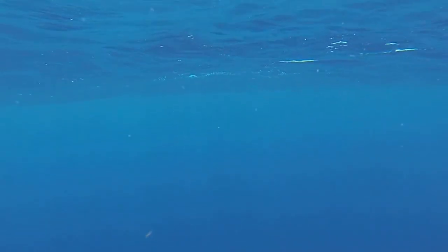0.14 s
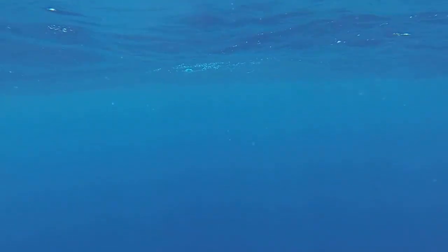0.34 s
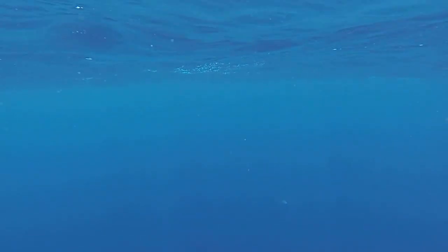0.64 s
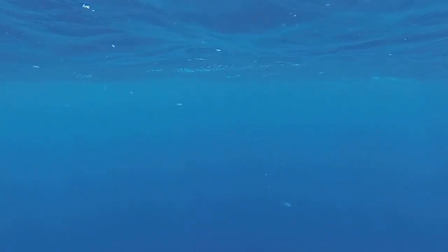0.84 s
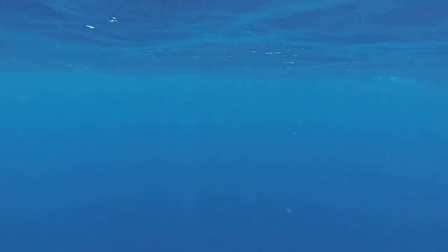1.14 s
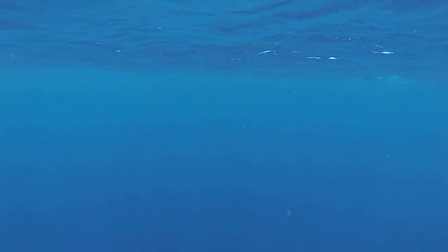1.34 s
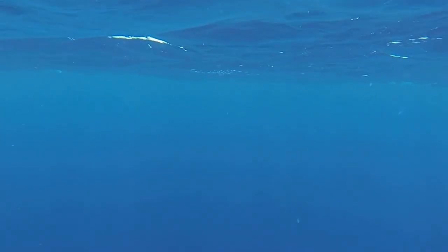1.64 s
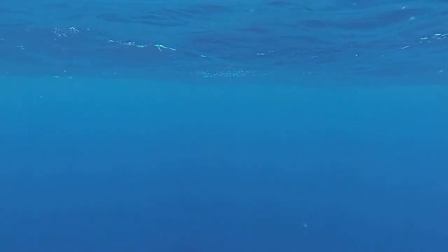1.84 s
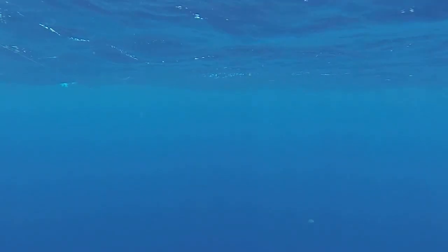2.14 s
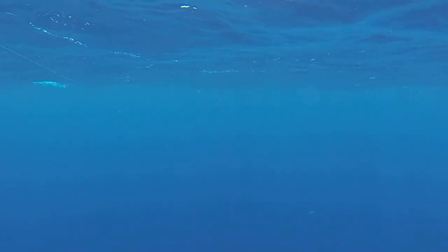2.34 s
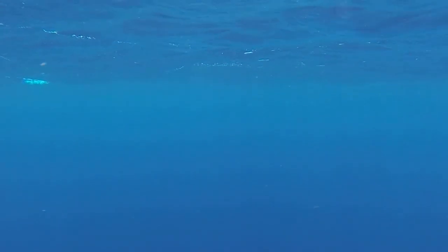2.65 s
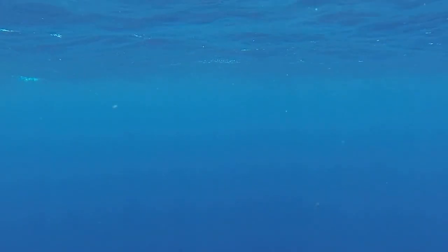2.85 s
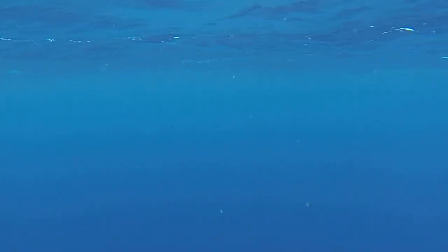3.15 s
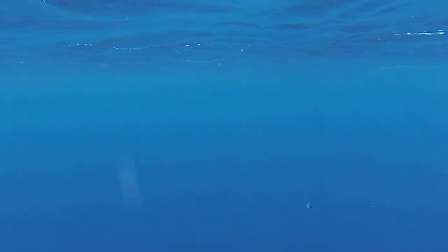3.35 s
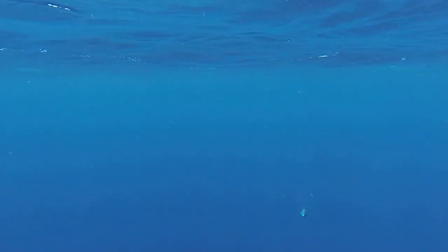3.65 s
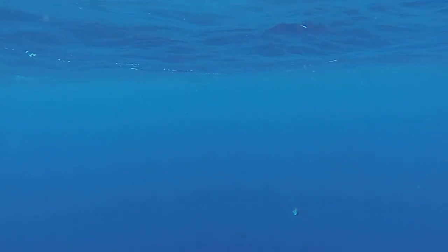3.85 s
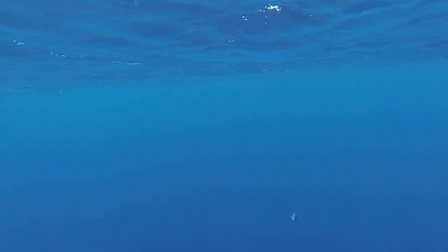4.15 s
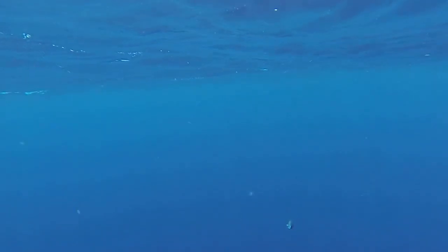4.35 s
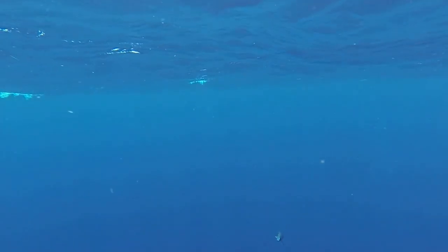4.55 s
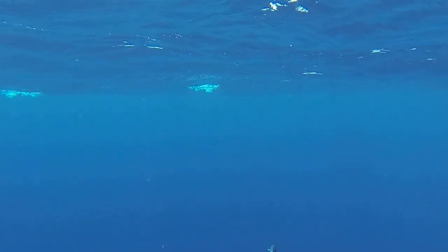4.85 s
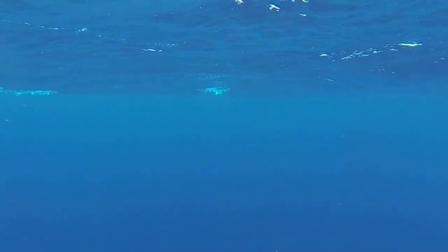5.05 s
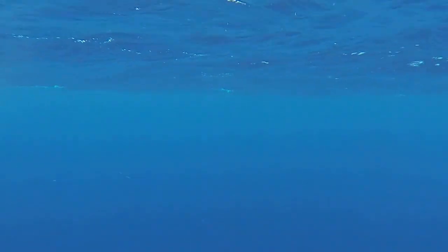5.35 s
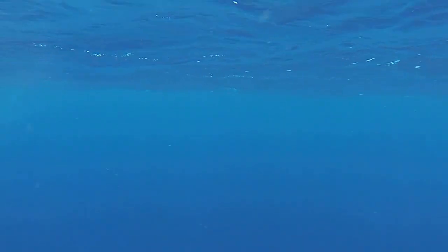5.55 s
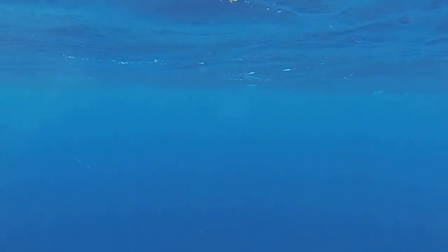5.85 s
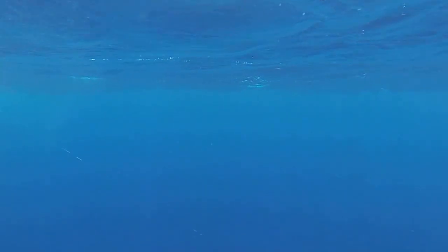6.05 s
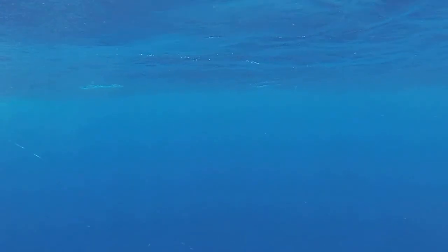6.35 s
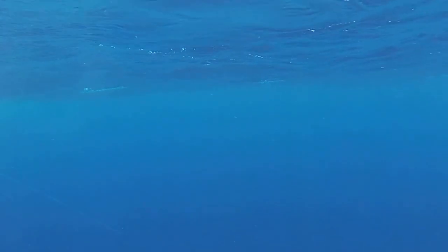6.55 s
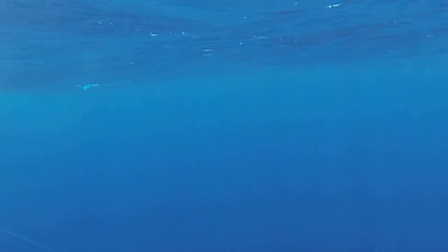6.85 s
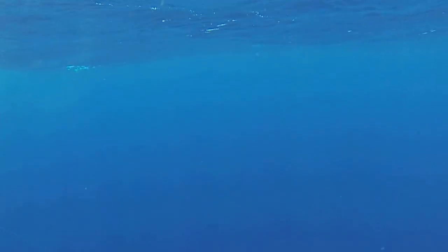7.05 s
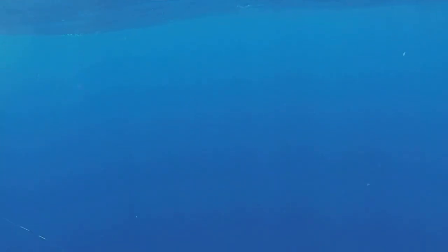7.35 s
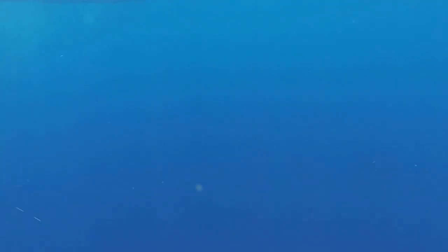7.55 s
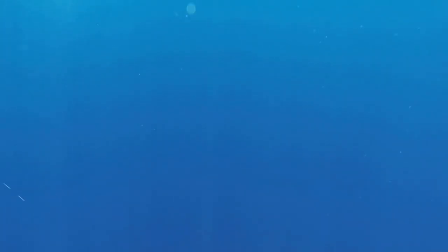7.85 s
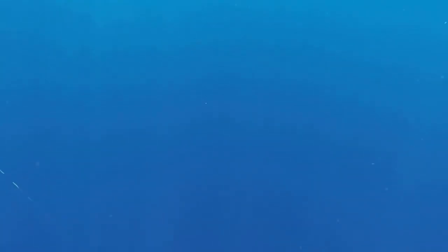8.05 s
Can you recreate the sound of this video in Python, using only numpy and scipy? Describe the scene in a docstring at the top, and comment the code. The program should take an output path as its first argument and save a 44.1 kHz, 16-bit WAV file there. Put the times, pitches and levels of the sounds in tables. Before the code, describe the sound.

Underwater, an idling boat engine hums and rattles, gently swelling and fading over low water rumble and occasional bubble gulps.

```python
"""A six-cylinder boat diesel runs at about 700 rpm, heard from just under the sea surface.
Its periodic firing forces the hull to drone at the engine orders, and its knocks, repeating each
cycle, excite damped resonances in the metal. The sound swells and fades as waves pass overhead.
Water rumbles and air pockets gulp against the case of a submerged camera; a few ticks and the
thin whine and hiss of its electronics lie on top."""
import sys
import numpy as np
from scipy import signal
from scipy.fft import rfft, irfft, next_fast_len
from scipy.io import wavfile
from scipy.ndimage import uniform_filter1d, map_coordinates

SR = 44100
rng = np.random.default_rng(int(sys.argv[2]) if len(sys.argv) > 2 else 0)


def pcm_store(signal):
    """Save signal as 16-bit PCM."""
    levels = np.round(np.clip(np.atleast_2d(signal), -1, 1) * 32767)
    wavfile.write(sys.argv[1], SR, levels.astype(np.int16).T)


N = 361619
TIME = np.arange(N) / SR
FREQ = np.maximum(np.fft.rfftfreq(N, 1 / SR), 1)
CYLINDERS = 6

# engine speed, hunting about its idle: (time [s], firing rate [Hz])
FIRING_RATE = [(0.0, 34.42), (1.15, 35.55), (1.69, 34.55), (1.97, 34.5), (2.46, 35.8), (3.23, 34.58),
               (3.74, 35.19), (4.56, 34.74), (4.92, 35.27), (5.54, 35.24), (5.97, 34.15), (6.21, 34.44),
               (6.45, 35.46), (6.64, 35.58), (7.15, 34.82), (7.87, 35.12), (8.2, 35.02)]
def crankshaft(twist_firings=0.006):
    """Phase is the integral of frequency: the running count of firings, jittered by uneven rotation."""
    return np.cumsum(curves(FIRING_RATE)[0]) / SR + twist_firings * drift(10)

# hull tones: (frequency [multiple of firing rate], level [dB re hull])
HULL_ORDERS = [(1, 2), (5, -4.5), (6, -10.5), (8, -13.5), (9, -8), (11, -23), (14, -25), (15, -22),
               (19, -25), (20, -25), (21, -17.5), (24, -28), (25, -26), (26, -29)]
# hull response: (frequency [Hz], relative gain [dB])
HULL_RESPONSE = [(15, -29.5), (45, -15), (60, 6), (85, 0.5), (102, 3), (120, 6.5), (135, 6), (155, 3),
                 (172, -3), (190, 4.5), (208, 6), (230, -7.5), (295, -3), (335, -5), (370, -9.5),
                 (480, -28), (700, -63.5)]
def hull(firings):
    """Forced vibration: firing orders, with cycle harmonics between as no two cylinders push alike."""
    tones = sum(undb(db) * order_tone(firings, k, waver_db=.5 + .7, waver_rad=.22)
                for k, db in HULL_ORDERS)
    sounded_orders = [k for k, _ in HULL_ORDERS] + [2, 2.5, 3, 3.5, 7]
    comb = unit(ring(cyclic_noise(firings, repeat=0.57, skip=sounded_orders), spectrum(HULL_RESPONSE)))
    return wave_gain(db=-43.5, follow=2.2) * (tones + beating(firings) + undb(2.35) * comb)

def beating(firings, order=7, db=-7.5, second_db=-4, beat_s=0.6, crest_s=0.13):
    """Interference: an engine order and a weaker tone just above it beat at their difference frequency."""
    phase = 2 * np.pi * order * firings
    second = undb(second_db) * np.sin(phase + 2 * np.pi * (TIME - crest_s) / beat_s)
    return undb(db) * np.sqrt(2) * (np.sin(phase) + second)

# tones that follow the waves: (frequency [multiple of firing rate], level [dB], swell response [dB/dB])
SWELLING_ORDERS = [(2.5, -44, 3), (3, -45, 0.7)]
# tones that fade on their own: (time [s], level of order 2 [dB], level of order 3.5 [dB])
FADING_ORDERS = [(0, -39, -39), (0.4, -50, -42), (1.0, -35, -37.5), (1.5, -47, -41), (1.9, -41, -41),
                 (2.3, -40, -39.5), (3.05, -40, -35), (3.55, -49, -48.5), (3.95, -58, -42.5),
                 (4.3, -44, -35), (4.7, -32.5, -31), (5.15, -35.5, -41), (5.65, -48.5, -46.5),
                 (6.35, -45, -33), (6.9, -43.5, -42), (7.35, -39.5, -37), (7.849, -37, -29.5),
                 (8.2, -37, -31.5)]
def drone(firings):
    """Periodic forcing: strong low tones at whole and half multiples of the firing rate."""
    swelling = sum(order_tone(firings, k, waver_db=3.6, waver_rad=0.51) * wave_gain(db, follow)
                   for k, db, follow in SWELLING_ORDERS)
    fading = sum(order_tone(firings, k, waver_db=.5, waver_rad=.3) * undb(db)
                 for k, db in zip((2, 3.5), curves(FADING_ORDERS)))
    return swelling + fading

def order_tone(firings, order, waver_db, waver_rad):
    """Random modulation: the moving surface makes one engine order waver in level and phase."""
    phase = 2 * np.pi * (order * firings + rng.random()) + waver_rad * drift(1.18)
    return unit(np.sin(phase) * undb(waver_db * drift(0.94)))

# firing and valve knocks of one cycle: (position [firings], thud level [dB], clatter level [dB])
CYCLE_KNOCKS = [(0.08, -19, -15), (0.309, -6.5, -3), (0.539, -9, -6.5), (1.1, -22, -13), (1.311, 0.5, -1.5),
                (1.52, -10, -8.5), (2.28, -8, -0.5), (2.52, -3.5, -8.5), (2.769, -31.5, -16),
                (3.091, -28, -8), (3.309, -7.5, -1), (3.53, -5.5, -10), (4.294, -5.5, -4), (4.54, -11, -11),
                (4.72, -12, -13.5), (5.05, -9.5, -12.5), (5.288, -1.5, -1), (5.56, -13.5, -7)]
THUD_COLUMN, CLATTER_COLUMN = 1, 2
# firings that strike harder, scaled by each layer's accent: (time [s], extra level [dB])
HARD_FIRINGS = [(0.9, 1.5), (1.01, 3), (1.04, 5.5), (1.13, 4), (1.24, 7), (2.47, 4), (2.72, 2.5),
                (2.78, 4.5), (2.89, 2), (2.92, 3.5), (2.95, 4), (3.04, 2.5), (3.12, 5.5), (4.15, 4.5),
                (4.3, 5.5), (4.5, 5), (4.95, 2), (5.18, 4), (5.24, 1.5), (5.72, 0.5), (5.95, 3.5),
                (6.22, 3), (6.36, 3.5), (6.56, 3), (7.04, 3.5), (7.15, 4.5), (7.24, 1), (7.58, 4),
                (7.78, 1.5), (7.9, 0.5), (7.92, 2.5)]
def knocks(firings, column, modes, rise_s, decay_s, scatter_db, accent, wash_db, alike, repeat, evenness):
    """Impact excitation: each knock sets off a short, exponentially decaying rattle in the modes."""
    table, age = np.array(CYCLE_KNOCKS), np.arange(2048) / SR
    cycle_starts = CYLINDERS * np.arange(int(firings[-1] / CYLINDERS) + 1)
    positions = np.add.outer(cycle_starts, table[:, 0]).ravel()
    # all knocks of one firing share its force
    force_db = scatter_db * rng.standard_normal(CYLINDERS * len(cycle_starts))
    for s, extra_db in HARD_FIRINGS:
        force_db[int(np.interp(s, TIME, firings))] = accent * extra_db
    knock_db = np.tile(table[:, column], len(cycle_starts)) + force_db[positions.astype(int)]
    impacts = np.bincount(np.searchsorted(firings, positions), undb(knock_db) ** 2, N)
    # multipath through hull and water rounds each attack and leaves a wash between knocks
    shape = (1 - np.exp(-age / rise_s)) * np.exp(-age / decay_s)
    power = signal.fftconvolve(impacts, shape ** 2)[:N]
    envelope = np.sqrt(np.abs(power / power.mean()) + undb(wash_db) ** 2)
    # the rattle is partly alike in every firing, partly the cylinder's own, partly new
    common = np.sqrt(alike) * cyclic_noise(firings, repeat=0.99, period=1)
    individual = np.sqrt(1 - alike) * cyclic_noise(firings, repeat)
    body = np.sqrt(resonances(modes))  # square root, as it filters twice
    rattle = signal.hilbert(ring(common + individual, body), next_fast_len(N))[:N]
    even_rattle = rattle.real / np.abs(rattle) ** evenness  # flattened so the knocks set the beat
    return unit(ring(envelope * even_rattle, body))

def cyclic_noise(firings, repeat, period=CYLINDERS, skip=()):
    """Partial periodicity: a share of the noise recurs every `period` firings, less the skipped orders."""
    size = 1024 * period
    harmonics = np.exp(2j * np.pi * rng.random(size // 2))
    harmonics[[round(period * k) for k in skip]] = 0
    position = firings / period % 1 * size
    periodic = map_coordinates(irfft(harmonics, size), [position], order=1, mode="nearest")
    return np.sqrt(repeat) * unit(periodic) + np.sqrt(1 - repeat) * rng.standard_normal(N)

# the hull's main metallic modes: (frequency [Hz], bandwidth [Hz], relative gain [dB])
METAL_MODES = [(1575, 58, -4.5), (1649, 99, -3.5), (1722, 91, -7.5)]
def metal_ring(firings, growth_db_per_s=0.18):
    """Resonance: knocks ring a cluster of hull modes near 1.65 kHz, which slowly grows louder."""
    metal = knocks(firings, CLATTER_COLUMN, METAL_MODES, rise_s=0.00032, decay_s=0.0064,
                   scatter_db=1.1, accent=1.0, wash_db=-7.0, alike=0.25, repeat=0.47, evenness=0.37)
    growth = undb(growth_db_per_s * (TIME - TIME.mean()))
    return wave_gain(db=-51, follow=1.08) * growth * metal

# modes around the main ring: (frequency [Hz], bandwidth [Hz], relative gain [dB])
BRIGHT_MODES = [(1261, 150, -13), (1348, 146, -7.5), (1947, 162, -7), (2030, 170, -14), (2265, 190, -24),
                (2740, 270, -26), (3250, 290, -29.5), (3580, 150, -35.5), (3580, 1400, -39)]
def clatter(firings, fade_db_per_s=0.08):
    """Modal superposition: knocks excite widely spread modes in a bright clatter that slowly recedes."""
    rattle = knocks(firings, CLATTER_COLUMN, BRIGHT_MODES, rise_s=0.00048, decay_s=0.0076,
                    scatter_db=0.94, accent=0.44, wash_db=-9.0, alike=0.15, repeat=0.32, evenness=0.77)
    fade = undb(-fade_db_per_s * (TIME - TIME.mean()))
    return wave_gain(db=-54.3, follow=0.7) * fade * rattle

# modes of the engine block: (frequency [Hz], bandwidth [Hz], relative gain [dB])
THUD_MODES = [(409, 90, 4.5), (517, 85, 4.5), (674, 133, 4), (758, 63, -0.5), (867, 100, 4), (1015, 69, -5),
              (1220, 440, -9.5)]
def block_thud(firings):
    """Damped vibration: the block's low modes answer each knock with a short thud."""
    thud = knocks(firings, THUD_COLUMN, THUD_MODES, rise_s=0.00079, decay_s=0.0053,
                  scatter_db=0.74, accent=0.15, wash_db=-6, alike=0.073, repeat=0.21, evenness=0.49)
    return wave_gain(db=-52, follow=1.2) * thud

# rise and fall of the engine sound under the waves: (time [s], swell [dB])
WAVE_SWELL = [(0.0, -2), (0.4, -1), (0.75, 0.65), (1.15, -0.1), (1.5, -1.5), (2.25, 0.03), (2.6, 0.7),
              (2.97, 2.5), (3.2, 0.6), (3.5, -4), (3.85, -3), (4.3, 1.2), (4.6, 2), (4.9, 1.5),
              (5.45, -2.5), (5.8, -0.8), (6.25, 1), (6.5, -0.1), (6.95, -0.05), (7.6, 1.5), (7.93, 3.5),
              (8.2, 3.5)]
def wave_gain(db, follow):
    """Amplitude modulation: passing waves move a layer's level by `follow` dB per dB of swell."""
    return undb(db + follow * curves(WAVE_SWELL)[0])

# spectrum of the rumble: (frequency [Hz], relative level [dB])
RUMBLE_SPECTRUM = [(5, -33.5), (11, -9.5), (20, -3), (28, 1), (36, 0), (45, 5), (60, -11.5), (80, -16),
                   (100, -2.5), (118, -6.5), (140, -23), (300, -36.5), (600, -73)]
# strength of the rumble: (time [s], level [dB])
RUMBLE_LEVEL = [(0, -38), (.55, -32), (.85, -35.5), (1.3, -28.5), (1.7, -36), (2.9, -30.5), (3.6, -37),
                (4.65, -31), (5, -39), (5.35, -31), (5.65, -35), (7.3, -29.5), (8.2, -29)]
def water_rumble():
    """Pressure fluctuation: water pushing on the case makes low-frequency noise."""
    return undb(curves(RUMBLE_LEVEL)[0]) * shaped_noise(RUMBLE_SPECTRUM)

# air pockets at the case: (time [s], frequency [Hz], peak level [dB], rise [s], decay [s])
AIR_POCKETS = [(0.558, 97, -23, 0.0052, 0.026), (1.065, 109, -17.5, 0.011, 0.0041),
               (1.067, 182, -26, 0.0053, 0.011), (1.068, 38.55, -14, 0.013, 0.079),
               (1.147, 405, -39, 0.0068, 0.033), (3.008, 94.5, -12, 0.031, 0.027),
               (3.007, 35.1, -12, 0.042, 0.047), (5.217, 417, -45, 0.011, 0.014)]
def gulps():
    """Bubble resonance: each air pocket swells up and rings out at its natural frequency."""
    out = np.zeros(N)
    for s, hz, db, rise, decay in AIR_POCKETS:
        age = np.maximum(TIME - s, 0)
        attack = np.sin(np.pi / 2 * np.minimum(age / rise, 1))
        release = np.exp(-np.maximum(age - rise, 0) / decay)
        out += undb(db) * attack * release * np.sin(2 * np.pi * hz * age)
    return out

# a gurgle and ticks in the water: (time [s], frequency [Hz], bandwidth [Hz], peak level [dB], decay [s])
WATER_TICKS = [(.510, 1250, 650, -39, .022), (2.3213, 8800, 2000, -51, .0006),
               (2.4700, 3000, 2300, -39.5, .0004), (7.729, 8500, 5000, -59, .003),
               (7.734, 8500, 5000, -55, .005), (7.743, 10000, 6000, -52, .002)]
def ticks(size=2048):
    """Transient response: an impulse and a short fizz pass twice through a resonator."""
    out, age = np.zeros(N + size), np.arange(size) / SR
    for s, hz, width, db, decay in WATER_TICKS:
        b, a = signal.iirpeak(hz, hz / width, SR)
        crack = rng.standard_normal(size) * np.exp(-age / decay) + 8 * (age == 0)
        snap = signal.lfilter(b, a, signal.lfilter(b, a, crack))
        out[int(s * SR):][:size] += undb(db) * snap / np.abs(snap).max()
    return out[:N]

# electronic hiss: (frequency [Hz], relative level [dB])
HISS_SPECTRUM = [(300, -1), (2700, 0), (4000, -4), (5400, -8), (5750, -4.5), (6100, -9), (7000, -11),
                 (9500, -15), (12800, -16.5), (15000, -26)]
def electronics(whine_hz=5694, frame_hz=59.94, duty=.42, hiss_db=-67.0):
    """Pulse modulation: over steady hiss, the camera's whine and its octave pulse at its frame rate."""
    gate = uniform_filter1d((TIME * frame_hz % 1 < duty) * 1., size=40)
    phase = 2 * np.pi * whine_hz * TIME + .55 * drift(40)
    fundamental = undb(-87) * (1 + gate) / 2 * unit(np.sin(phase))
    octave = undb(-80.5) * gate * unit(np.sin(2 * phase))
    return fundamental + octave + undb(hiss_db) * shaped_noise(HISS_SPECTRUM)

def undb(db):
    """Decibels to amplitude ratio."""
    return 10 ** (np.asarray(db) / 20)

def unit(x):
    """Normalisation to rms 1."""
    return x / np.sqrt(np.mean(x ** 2))

def curves(table):
    """Linear interpolation of a timed table's columns at every sample."""
    s, *columns = np.transpose(table)
    return [np.interp(TIME, s, c) for c in columns]

def drift(hz):
    """Low-passed noise: a smooth random drift of rms 1."""
    return unit(irfft(rfft(rng.standard_normal(N)) * np.exp(-(FREQ / hz) ** 2), N))

def spectrum(points):
    """Gain through (frequency [Hz], level [dB]) points, falling 24 dB per octave above the last."""
    hz, db = np.transpose(points)
    return undb(np.interp(np.log(FREQ), np.log(hz), db)) * np.minimum(hz[-1] / FREQ, 1) ** 4

def shaped_noise(points):
    """Spectral shaping of white noise, at rms 1."""
    return unit(ring(rng.standard_normal(N), spectrum(points)))

def resonances(modes):
    """Power summation of steep-sided resonances into one gain curve."""
    gains = (undb(db) / (1 + ((FREQ - hz * hz / FREQ) / width / 1.3) ** 2) for hz, width, db in modes)
    return np.sqrt(sum(gain ** 2 for gain in gains))

def ring(x, gain):
    """Causality: a minimum-phase filter with the given gain rings only after each blow."""
    cepstrum = irfft(np.log(gain + gain.max() / 10 ** 6), N)
    cepstrum[1:N // 2] *= 2
    cepstrum[N // 2:] = 0
    return irfft(rfft(x, N) * np.exp(rfft(cepstrum)), N)

def scene():
    """Superposition: the engine heard through the water, plus the small sounds close by."""
    firings = crankshaft()
    knocking = metal_ring(firings) + clatter(firings) + block_thud(firings)
    humming = hull(firings) + drone(firings)
    nearby = water_rumble() + gulps() + ticks() + electronics()
    return (knocking + humming + nearby)[None]

def record(dry):
    """Band limiting: a steep low-pass filter cuts the treble above 15 kHz."""
    return signal.sosfilt(signal.ellip(8, .2, 70, 15000, fs=SR, output="sos"), dry)

dry = scene()
out = record(dry)
pcm_store(out)
```